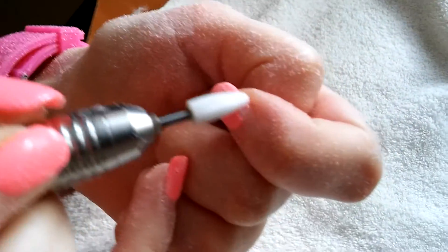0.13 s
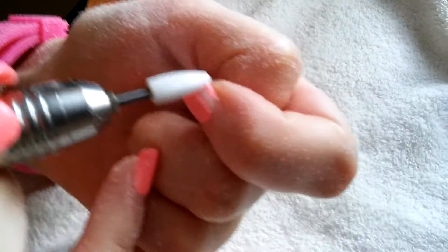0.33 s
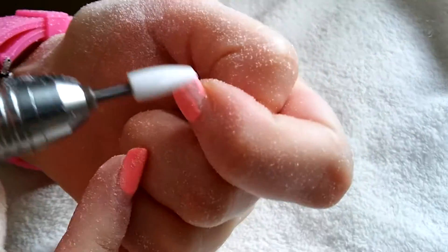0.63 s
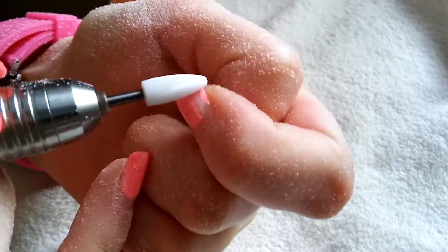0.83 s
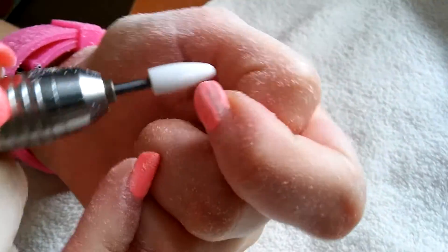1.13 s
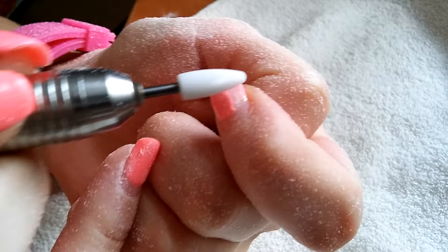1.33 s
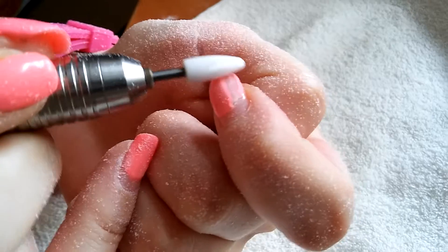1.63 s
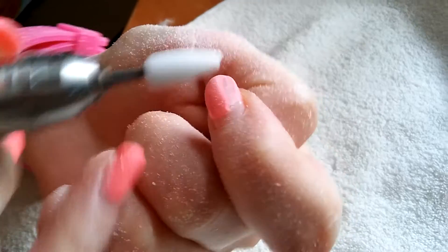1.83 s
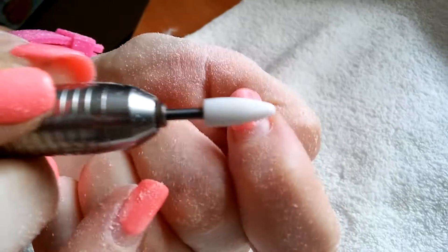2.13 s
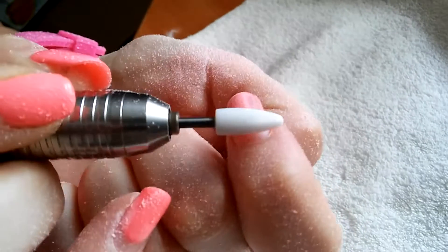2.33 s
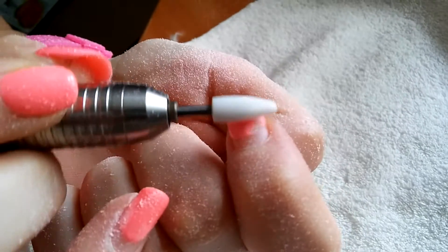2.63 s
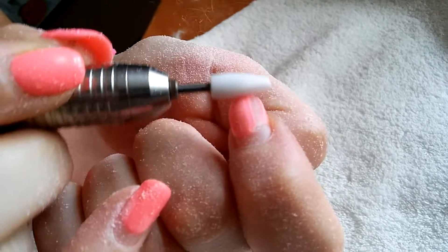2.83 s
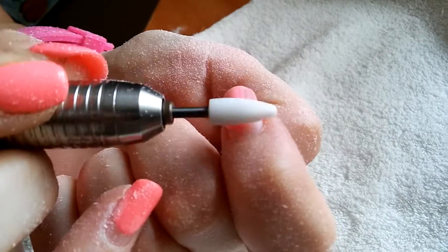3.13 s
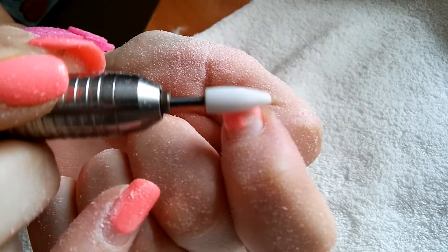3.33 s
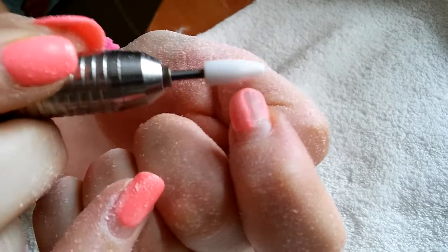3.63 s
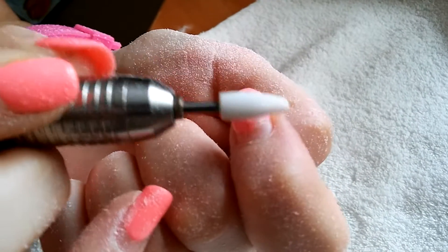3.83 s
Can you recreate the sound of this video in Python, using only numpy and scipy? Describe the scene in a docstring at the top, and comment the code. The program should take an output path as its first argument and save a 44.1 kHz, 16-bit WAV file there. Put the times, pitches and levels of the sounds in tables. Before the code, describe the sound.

A small electric nail drill whines and hisses steadily, close by in a quiet room. Its bit ticks onto a fingernail and grinds with a shrill, throbbing ring until 0.5 seconds. Shorter bursts follow around 1 second and, softer, 1.6. After idling, it grinds again from 2.6 to 2.9 and from 3.2 to 3.6, loudest near 3.6 as the motor sags slightly. A faint touch comes just before 4 seconds.

```python
"""Electric nail drill on a thumbnail

A drill at about 30000 rpm is laid on the nail five times, then lightly once more. Idle, it whines on
high multiples of its shaft speed over bearing hiss. In contact the bit strikes once a turn, the nail
sings near 4 kHz and the motor sags. A phone close by mirrors that tone about 4 kHz, so it throbs."""
import sys
import numpy as np
from scipy import signal
from scipy.fft import rfft, irfft
from scipy.io import wavfile
from scipy.ndimage import uniform_filter1d

SR = 44100
rng = np.random.default_rng(int(sys.argv[2]) if len(sys.argv) > 2 else 0)


def store_wav(level_fs):
    """Save 16-bit WAV to argv[1]."""
    pcm = np.round(np.clip(np.atleast_2d(level_fs), -1, 1) * 32767)
    wavfile.write(sys.argv[1], SR, pcm.T.astype(np.int16))


N = 176400
T = np.arange(N) / SR
SHAFT_HZ = 496.2  # nominal turns per second

# colour of the nail when scraped or bumped: f/Hz, level/dB
NAIL_COLOUR = [(500, -13), (2700, 1), (3200, -25), (3850, 19), (4400, 14.5), (5500, -7), (7400, 16),
               (9500, 3), (12000, -14)]


def undb(db):
    """Decibels to gain."""
    return 10 ** (np.asarray(db) / 20)


def curve(rows, column=1):
    """One column of a table, joined by straight lines in time."""
    rows = np.array(rows)
    return np.interp(T, rows[:, 0], rows[:, column])


def wander(rate_hz):
    """Smooth random modulation with a spread near 1."""
    steps = np.interp(T * rate_hz, np.arange(4096), rng.standard_normal(4096))
    return 1.59 * uniform_filter1d(steps, max(int(SR / rate_hz / 2), 1))


def noise(colour):
    """Noise of rms 1, shaped by rows of f/Hz, level/dB."""
    hz, db = np.array(colour).T
    bin_hz = np.maximum(np.arange(N // 2 + 1) * SR / N, 1)
    shape = undb(np.interp(np.log(bin_hz), np.log(hz), db))
    coloured = irfft(rfft(rng.standard_normal(N)) * shape, N)
    return coloured / coloured.std()


def swell(at, half_width):
    """A bell-shaped rise and fall."""
    return np.exp(-((T - at) / half_width) ** 2)


def shaft_angle():
    """The shaft turns with a slight jitter and sags under load; its angle in radians."""
    # shaft speed: t/s, f/Hz
    speed = [(0, 496.2), (.25, 495), (.39, 496.2), (.53, 493.4), (.68, 498.6), (.86, 500.1), (1.04, 495.8),
             (1.25, 500.8), (1.52, 503), (1.68, 501), (2.15, 502), (2.37, 500.2), (2.66, 495.1),
             (2.86, 493.5), (3.0, 498.3), (3.23, 498.2), (3.43, 490.5), (3.58, 488.2), (3.73, 497.6),
             (3.92, 501.8)]
    return 2 * np.pi * np.cumsum(curve(speed) * (1 + .0003 * wander(120))) / SR


def motor_whine(angle, running_db):
    """Flickering lines on multiples of the shaft speed, under a faint, drifting top comb."""
    # lines that ride on the running level: shaft multiple, level/dB
    riding_lines = [(10, -59.5), (16, -66), (17, -63), (20, -61.5), (28, -72), (31, -74)]
    lines = [(k, db + running_db) for k, db in riding_lines]
    lines += [(20, -54)]  # the strongest line ignores the running level
    lines += [(k, -78.5 + running_db + 4 * wander(1.8)) for k in range(22, 32)]
    whine = np.zeros(N)
    for k, db in lines:
        gain = undb(db + 1.5 * wander(30.009))
        wobble = .084 * (20 / k) ** 2 * wander(120)
        whine += gain * np.cos(k * angle + wobble + 2 * np.pi * rng.random())
    return np.sqrt(2) * whine


def bearing(angle, running_db):
    """The bearing hisses in step with the shaft and rattles with a loose, fluttering ring."""
    # colour of the hiss: f/Hz, level/dB
    hiss_colour = [(2400, -12.5), (4100, -14.5), (4900, -4.5), (5400, -11.5), (8000, 1.5), (9300, -5.5),
                   (10600, -7.5), (11800, -18)]
    hiss = noise(hiss_colour) * (1 + .13 * np.cos(angle)) * undb(-49.5 + running_db)
    rattle = signal.lfilter(*signal.iirpeak(2678, Q=14, fs=SR), rng.standard_normal(N))
    return hiss + rattle / rattle.std() * undb(-61 + running_db + 2 * wander(70))


def room_tone():
    """A bed of uneven room noise and a wavering hum."""
    # colour of the still room: f/Hz, level/dB
    room_colour = [(20, -29), (58, -1.5), (125, -1), (210, -12), (310, -6), (520, -11), (660, -5.5),
                   (820, -16), (1750, -8), (2700, -16.5), (3800, -22.5), (4800, -17), (12000, -32)]
    hum_hz = 163
    hum_gain = np.sqrt(2) * undb(-63 + 2 * wander(7.91))
    hum = hum_gain * np.sin(2 * np.pi * hum_hz * T + .5 * wander(1.99))
    return undb(-53 + wander(10)) * noise(room_colour) + hum


def contact():
    """Envelopes of ring, rasp and top, and of the skid as the bit slips off; the ring fades last."""
    # one list per stroke of the bit: t/s, nail ring/dB, 8 kHz rasp/dB, top treble/dB
    strokes = [
        [(0, -80, -48.5, -71), (0.135, -39, -39, -54), (0.2, -31.5, -43.5, -56), (0.337, -25.5, -36.5, -48),
         (0.505, -30, -34, -39.5), (0.53, -30, -43, -43.5)],
        [(0.892, -36.5, -44, -51), (0.943, -27.5, -40.5, -57), (1.083, -30, -40.5, -33),
         (1.095, -32.5, -39, -37.5)],
        [(1.57, -45, -47, -63), (1.588, -43, -40, -48), (1.63, -41, -35.5, -44), (1.662, -35.5, -34, -43),
         (1.72, -45.5, -36.5, -41.5)],
        [(2.565, -61, -45, -66), (2.629, -35.5, -35.5, -55), (2.797, -26.5, -39, -45),
         (2.838, -26.5, -31.5, -35.5), (2.868, -39, -27.5, -37), (2.9, -41, -40.5, -36.5)],
        [(3.232, -49.5, -35.5, -62), (3.281, -48, -50, -58), (3.345, -28.5, -34, -54.5),
         (3.573, -19.5, -31.5, -29.5), (3.62, -32.5, -28, -34)],
        [(3.973, -65.5, -42, -62), (3.999, -72.5, -48, -63)],
    ]
    bite_s, lift_s, tail_s, tail_db = .006715, .008064, .035, -10.5
    gains, skid = np.zeros((3, N)), np.zeros(N)
    for rows in strokes:
        start, end = rows[0][0], rows[-1][0]
        before, after = np.maximum(start - T, 0), np.maximum(T - end, 0)
        touching = np.exp(-(before / bite_s) ** 2 - (after / lift_s) ** 2)
        attack = 1 - np.exp(-np.maximum(T - start, 0) / bite_s)
        tail = (after > 0) * undb(tail_db) * np.exp(-after / tail_s)
        ringing = np.maximum(touching * attack, tail)
        levels = undb([curve(rows, column) for column in (1, 2, 3)])
        gains += np.array([ringing, touching, touching]) * levels
        skid += swell(end, half_width=.014)
    return gains, skid


def grinding(angle, gains, skid):
    """The bit strikes once a turn: partials that come and go as the contact moves, ragged in a skid."""
    # partials from the third shaft multiple up: level/dB re the stroke's envelope there
    partials = [-43, -37.5, -35, -41.5, -40.5, -4, -24.5, -26.5, -33, -27.5, -40, -17, -14, -0.5, -9, -11.5,
                -13, -10, -16.5, -15, -15.5, -14.5, -16, -12, -10.5, -6, -10, -15, -17]
    # single partials flaring as the contact moves: t/s, shaft multiple, half width/s, level/dB
    flares = [(0.255, 4, 0.05827, -40), (0.36, 9, 0.05523, -31), (0.432, 15, 0.055, -34),
              (.47, 10, 0.06, -43), (0.976, 10, 0.11, -42.5), (1.642, 9, 0.069, -45.5),
              (1.694, 4, 0.11, -48), (2.82, 4, 0.16, -40), (2.67, 6, 0.025, -43.5), (2.834, 19, 0.036, -37),
              (2.835, 27, .018, -42), (2.85, 26, .014, -42), (2.889, 20, .03, -36.5),
              (3.546, 9, 0.064, -34.5), (3.537, 15, 0.0506, -37), (3.553, 19, 0.072, -32.5),
              (3.583, 26, 0.03804, -37.5)]
    # where the ring, rasp and top envelopes sit: f/Hz
    band_centres = (4500, 8000, 12500)
    # partials on the nail's own tones waver least: shaft multiple, share of the full waver
    waver_shares = {8: 0, 16: .45}
    ring, rasp, top = gains
    flare_gate = np.minimum(rasp / .002, 1)
    out = np.zeros(N)
    for k, db in enumerate(partials, start=3):
        band = np.interp(k * SHAFT_HZ, band_centres, [0, 1, 2])
        below = min(int(band), 1)
        envelope = gains[below] ** (below + 1 - band) * gains[below + 1] ** (band - below)
        waver = waver_shares.get(k, 1)
        envelope *= undb(db + waver * 4.5 * wander(28))
        for at, multiple, half_width, flare_db in flares:
            if round(multiple) == k:
                envelope = np.hypot(envelope, undb(flare_db) * swell(at, half_width) * flare_gate)
        phase = 1.14 * rng.standard_normal() + .15 * wander(28)
        phase += .3 * skid * band * wander(400)  # a skid roughens the highs most
        flutter = 1 + waver * .12 * wander(250)
        out += envelope * flutter * np.cos(k * angle + waver * phase)
    return np.sqrt(2) * out


def scraping(angle, gains, skid):
    """Grit tears off a puff of dust each turn; a bright, uneven crackle flares in the skid."""
    ring, rasp, top = gains
    dust = undb(-18.5) * np.sqrt(ring * rasp) * noise(NAIL_COLOUR)
    crackle_db = -19.5 + 10 * skid + 4 * wander(SHAFT_HZ)
    crackle = undb(crackle_db) * top * noise([(4250, -20), (8500, 0)])
    return (dust + crackle) * (1 + .33 * np.cos(angle))


def taps():
    """The bit bounces as it lands or leaves: a short ring of the nail builds as the crack fades."""
    # bumps of the bit on the nail: t/s, level/dB
    bumps = [(0.058, -34), (0.079, -26), (0.1, -31), (0.105, -33), (0.526, -35), (1.088, -40), (3.229, -49)]
    # modes of the nail: f/Hz, level/dB, t60/s
    nail_modes = [(1803, -4.5, 0.05513), (3835, 1, 0.058), (7250, 2.5, 0.03)]
    out, t = np.zeros(2 * N), T[:SR // 10]
    crack_s = .0015
    crack_fade = np.exp(-t / crack_s)
    for at, db in bumps:
        ring = np.zeros(len(t))
        for hz, mode_db, t60 in nail_modes:
            detuned_hz = hz * (1 + .0138 * rng.standard_normal())
            ring += undb(mode_db - 60 * t / t60) * np.sin(2 * np.pi * detuned_hz * t)
        crack = undb(.5) * noise(NAIL_COLOUR)[:len(t)] * crack_fade
        start = int(at * SR)
        out[start:start + len(t)] += undb(db) * (ring * (1 - crack_fade) + crack)
    return out[:N]


def hands():
    """Moving hands make soft swells of low rumble."""
    # hand movements: t/s, half width/s, level/dB
    moves = [(0.18, 0.059, -55.5), (0.472, 0.04892, -49.5), (2.135, 0.037, -52.5), (2.296, 0.13, -52),
             (3.123, 0.027, -53)]
    # colour of the rumble: f/Hz, level/dB
    rumble_colour = [(20, -25), (55, -1.5), (110, -1.5), (1000, -42)]
    return noise(rumble_colour) * sum(undb(db) * swell(at, half_width) for at, half_width, db in moves)


def scene():
    """One shaft drives the nail's sounds and the handpiece, over room tone and hand rumble."""
    # running level of the handpiece as it turns in the hand: t/s, level/dB
    running_level = [(0, 5), (.58, 3.5), (.82, 1.5), (1.17, 3), (1.52, 1), (1.8, 3.5), (2.0, -3.5),
                     (2.38, -2), (2.94, 1.5), (3.19, -4), (3.67, 3), (3.85, -3)]
    running_db = curve(running_level)
    angle = shaft_angle()
    gains, skid = contact()
    nail = grinding(angle, gains, skid) + scraping(angle, gains, skid) + taps()
    handpiece = motor_whine(angle, running_db) + bearing(angle, running_db)
    return (nail + handpiece + room_tone() + hands())[None]


def record(dry):
    """The phone splits its bands at 4 kHz and mirrors what lies near that edge, then cuts the top."""
    edge_hz, width_hz, mirror_db, top_hz = 4000, 76, 5.5, 15800
    spectrum = rfft(dry)
    bins = np.arange(spectrum.shape[-1])
    offset_hz = bins * SR / N - edge_hz
    near_edge = undb(mirror_db) * np.exp(-(offset_hz / width_hz) ** 2)
    mirror = np.conj(spectrum[:, np.abs(2 * round(edge_hz * N / SR) - bins)])
    throbbing = irfft(spectrum + near_edge * mirror, N)  # the nail's tone beats with its image
    return signal.sosfilt(signal.ellip(10, .2, 80, top_hz, fs=SR, output="sos"), throbbing)


dry = scene()
out = record(dry)
store_wav(out)
```